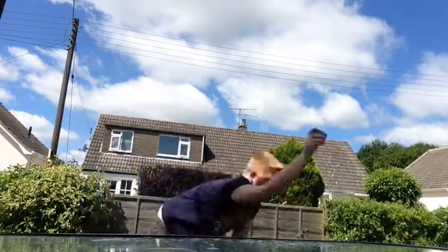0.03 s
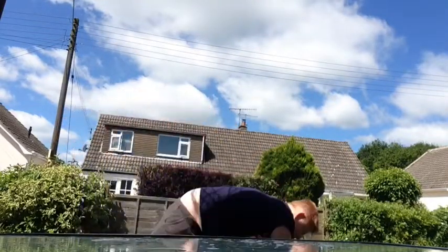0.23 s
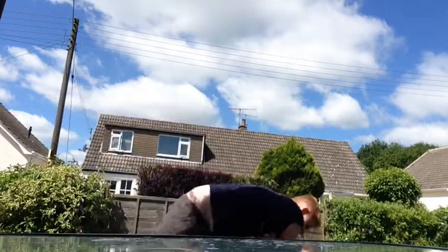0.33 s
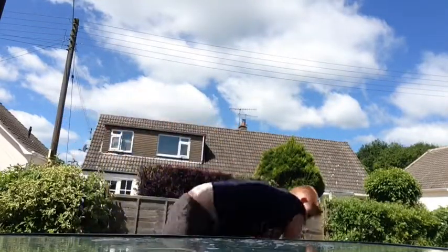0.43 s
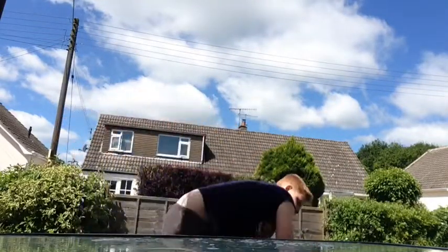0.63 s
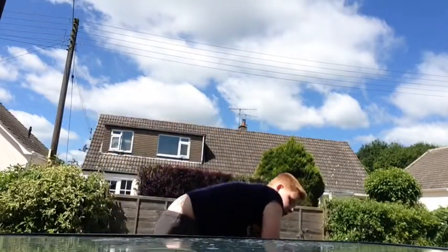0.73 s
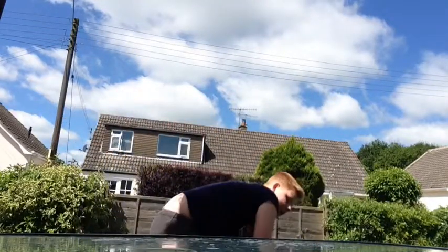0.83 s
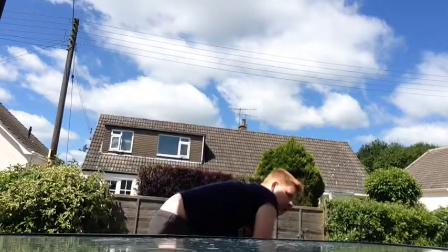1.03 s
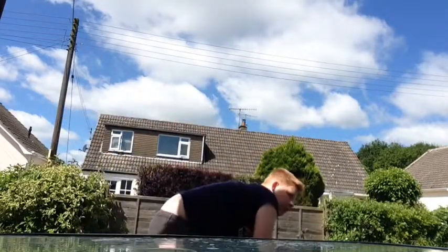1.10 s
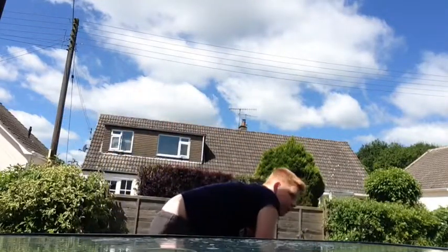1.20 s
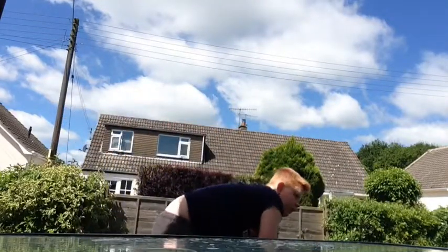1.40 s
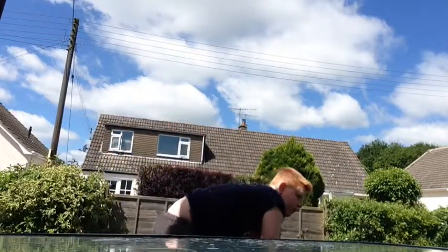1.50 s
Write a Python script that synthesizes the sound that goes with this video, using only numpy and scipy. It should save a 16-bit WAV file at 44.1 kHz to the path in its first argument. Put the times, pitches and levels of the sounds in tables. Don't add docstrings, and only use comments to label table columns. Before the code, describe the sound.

Sharp plastic crack with a heavy thud, followed by ever lighter bounces on gritty garden ground

```python
import sys
import numpy as np
from scipy import signal
from scipy.fft import rfft, irfft, next_fast_len
from scipy.io import wavfile
from scipy.ndimage import map_coordinates

SR = 44100
rng = np.random.default_rng(int(sys.argv[2]) if len(sys.argv) > 2 else 0)


def volts(x):
    e = np.asarray(x, float) / 20
    return 10 ** e


def unload_wav(signal):
    wavfile.write(
        sys.argv[1],
        SR,
        np.round(np.clip(np.atleast_2d(signal).T, -1, 1) * 32767).astype(np.int16),
    )


N = 68355


def unit(x):
    return x / np.sqrt(np.mean(x ** 2) + 1e-20)


def along(points, hz):
    point_hz, value = np.transpose(points)
    return np.interp(np.log(hz + 1), np.log(point_hz + 1), value)


def curve(rows):
    seconds, level_db = np.transpose(rows)
    return np.interp(np.arange(N) / SR, seconds, level_db)


def wobble(rate_hz):
    draws = rng.standard_normal(int(N * rate_hz / SR) + 4)
    return map_coordinates(draws, [np.arange(N) * rate_hz / SR])


def coloured(x, gain_db):
    size = next_fast_len(len(x) + 4096)
    gain = volts(gain_db(np.fft.rfftfreq(size, 1 / SR)))
    return unit(irfft(rfft(x, size) * gain, size)[:len(x)])


def hump(hz, centre_hz, below_db, above_db):
    octaves = np.log2((hz + 1) / centre_hz)
    slope_db = np.where(octaves < 0, below_db, above_db)
    return -np.sqrt(6.5 + (slope_db * octaves) ** 2)


def add(out, start_s, x):
    part = out[round(start_s * SR):][:len(x)]
    part += x[:len(part)]


# time in seconds, level in dB.
WIND_STRENGTH = [(0.0, -58.5), (0.124, -59.5), (0.25, -52.5), (0.328, -50), (0.482, -62), (0.702, -62),
                 (0.872, -52.5), (1.062, -58), (1.342, -52.5), (1.55, -60)]
# frequency in Hz, gain in dB.
RUMBLE_SPECTRUM = [(15, -39), (25, -9.5), (55, 0), (97, -0.5), (139, -1), (204, -9), (270, -16.5),
                   (498, -22), (561, -25.5), (600, -42.5), (780, -68.5), (1320, -120)]
# time in seconds, level in dB.
HOWL_STRENGTH = [(0.0, -49.5), (0.172, -54), (0.344, -52.5), (0.47, -60), (0.638, -56), (0.768, -55.5),
                 (1.208, -69), (1.368, -67.5), (1.55, -56)]
# frequency in Hz, gain in dB.
LEAF_SPECTRUM = [(240, -31.5), (400, -24), (643, -22), (1380, -16.5), (1790, -21.5), (3620, -30.5),
                 (4490, -32.5), (15500, -42)]
# time in seconds, level over their mean in dB.
LEAF_SWELL = [(0, 3), (.2, 3), (.5, 0), (.68, -5), (.95, -2), (1.13, -4), (1.28, 0), (1.4, 2), (1.55, 1)]


def wind():
    rumble = coloured(rng.standard_normal(N), lambda hz: along(RUMBLE_SPECTRUM, hz))
    rumble = unit(volts(3.0 * wobble(13.7)) * rumble)
    howl = coloured(rng.standard_normal(N), lambda hz: hump(hz, 182, 16, 16))
    hiss = coloured(rng.standard_normal(N), lambda hz: along(LEAF_SPECTRUM, hz))
    hiss = volts(0.71 * wobble(6.7)) * hiss
    leaves_db = -69
    out = volts(curve(WIND_STRENGTH) + 4.5) * rumble
    out += volts(curve(HOWL_STRENGTH) + 0.5) * howl
    return out + volts(curve(LEAF_SWELL) + leaves_db) * hiss


# peak in seconds, level in dB, rise in seconds, fall t60 in seconds, centre in Hz.
SLEEVE_SWISH = [
    (.160, -61, .035, .11, 5500),
    (.170, -69, .06, .1, 11000),
]
# peak in seconds, level in dB, rise in seconds, fall t60 in seconds, centre in Hz.
GROUND_SCUFFS = [(0.243, -31.5, 0.0056, 0.028, 3480), (0.259, -35.5, 0.0072, 0.19, 5160),
                 (.2600, -35.5, .004, 0.12, 1160), (0.716, -46, 0.0045, 0.066, 551),
                 (0.725, -49, 0.0087, 0.095, 3290), (.724, -62.5, 0.014, 0.15, 10000),
                 (.505, -69.5, 0.021, .2, 6505), (.7320, -38, 0.0074, 0.017, 2300),
                 (0.753, -56.5, 0.0081, 0.074, 2380), (0.807, -49, 0.0046, 0.012, 1950),
                 (0.818, -45.5, 0.0084, 0.14, 750), (0.831, -60.5, 0.025, 0.1, 6100),
                 (1.158, -53.5, 0.0032, 0.062, 2450), (1.155, -58, 0.0022, 0.07, 9000),
                 (1.183, -42, 0.0095, 0.15, 997), (1.203, -57, 0.0076, 0.17, 6150),
                 (1.2870, -65, 0.0012, 0.058, 4950), (1.300, -69, 0.0092, 0.33, 4210),
                 (1.3360, -60.5, 0.001, 0.09, 2800), (1.344, -75, 0.0036, 0.041, 10870),
                 (1.439, -71.5, 0.023, .15, 3800), (1.469, -58, 0.0038, 0.027, 4050),
                 (1.480, -57.5, 0.0018, 0.13, 1000), (1.485, -61, 0.0038, 0.2, 4620),
                 (1.540, -70, 0.0034, 0.062, 3560)]


def scuffs():
    out, t = np.zeros(N), np.arange(N) / SR
    grains_per_s, spread_db = 14000, 3
    for peak_s, db, rise, fall_t60, centre_hz in SLEEVE_SWISH + GROUND_SCUFFS:
        struck = rng.random(N) < grains_per_s / SR
        grain_db = spread_db * np.clip(rng.standard_normal(N), -2, 2)
        grit = struck * rng.standard_normal(N) * volts(grain_db)
        grit = coloured(grit, lambda hz: hump(hz, centre_hz, 9, 15))
        away = np.abs(t - peak_s)
        swell = np.where(t < peak_s, np.exp(-away / rise), volts(-60 * away / fall_t60))
        out += volts(db + 2.7 * wobble(200)) * swell * grit
    return out


# start in seconds, level in dB, pitch in Hz, t60 in seconds, rise
# in seconds.
LANDING_THUDS = [(0.244, -10.5, 77.2, 0.12, 0.0032), (0.246, -15, 276.6, 0.081, 0.0021),
                 (0.243, -17.5, 480.5, 0.08, 0.0011), (.2440, -22, 166, 0.11, 0.0014),
                 (0.245, -25, 337, .1, 0.00068), (0.298, -34.5, 90, 0.27, 0.0037),
                 (.7080, -16, 168.6, 0.024, 0.0014), (0.7187, -20, 112.1, 0.066, 0.00078),
                 (.7200, -30, 408, 0.019, 0.00051), (0.779, -40, 100.6, 0.049, 0.0025),
                 (.8065, -16.5, 93.9, 0.11, 0.0022), (.8100, -38.5, 521, .12, 0.0015),
                 (0.811, -50, 1103, 0.15, 0.0012), (1.152, -27, 138, 0.076, 0.0023),
                 (1.167, -24.5, 81.5, 0.16, 0.0045), (1.1818, -22, 143, 0.057, 0.0012),
                 (1.1800, -33.5, 307.6, 0.15, 0.0025), (1.1900, -42, 479, 0.2, 0.00084),
                 (1.207, -27.5, 86.6, 0.062, 0.0033), (1.1550, -39, 304, .06, 0.0017),
                 (1.4740, -44, 289.7, .1, .001), (1.4750, -45.5, 477, 0.1, 0.00078),
                 (1.4822, -33.5, 80.9, 0.17, 0.0011)]


def thuds():
    out, t = np.zeros(N), np.arange(SR // 2) / SR
    for start_s, db, hz, t60, rise in LANDING_THUDS:
        onset = (1 - np.exp(-t / rise)) ** 2
        add(out, start_s, volts(db - 60 * t / t60) * np.sin(2 * np.pi * hz * t) * onset)
    return out


# start in seconds, crack level in dB, ring level in dB, centre in Hz, crack t60 in seconds.
CONTACTS = [(0.2440, -19.5, -48, 370, 0.072), (.2445, -25.5, -40, 740, 0.013),
            (0.2439, -16.5, -53, 3520, 0.05), (0.244, -21.5, -45, 9000, 0.055),
            (.2456, -16, -37, 1489, 0.037), (0.2493, -27.5, -42, 4830, 0.041),
            (0.2725, -29, -45.5, 4000, 0.014), (0.8077, -33.5, -49.5, 1110, 0.048),
            (0.8083, -37.5, -53.5, 4560, 0.019), (.8120, -42, -59, 6270, 0.022),
            (.8090, -37, -57, 299, 0.05), (1.1720, -35.5, -41, 584, 0.057),
            (1.168, -35, -55.5, 2690, 0.037), (1.1698, -37.5, -59.5, 7090, 0.045),
            (1.1717, -32.5, -55.5, 1313, 0.047), (1.1850, -30.5, -45, 500, 0.042),
            (1.1893, -40, -66, 4970, 0.019), (1.1998, -43, -63, 7710, 0.016),
            (1.4714, -38.5, -49, 4170, 0.018), (1.4714, -45, -57, 7800, 0.0094),
            (1.4720, -40.5, -53.5, 2275, 0.041), (1.4726, -39.5, -53, 1137, 0.062),
            (1.4894, -52.5, -70, 3970, .02), (.2585, -30, -50, 5000, .015), (.2635, -30, -48, 2600, 0.024),
            (.2800, -31.5, -55, 6500, 0.017), (.2905, -40.5, -62, 7500, 0.019)]
# frequency in Hz, level in dB, t60 in seconds.
BOTTLE_MODES = [(750, 0, .03), (920, -2, .02), (1160, -1, .02), (1410, -3, .02), (1650, -5, .015),
                (2260, -3, .015), (2750, -3, .012), (3500, 0, .012), (4130, -3, .012), (4800, -5, .012)]


def knocks():
    out, t = np.zeros(N), np.arange(SR // 4) / SR
    for start_s, crack_db, ring_db, centre_hz, crack_t60 in CONTACTS:
        colour = lambda hz: hump(hz, centre_hz, 8, 11)
        crack = volts(crack_db - 60 * t / crack_t60) * coloured(rng.standard_normal(len(t)), colour)
        ring = np.zeros(len(t))
        for hz, db, t60 in BOTTLE_MODES:
            level_luck, pitch_luck = rng.standard_normal(2)
            decay = volts(db + 2 * level_luck + colour(hz) - 60 * t / t60)
            ring += decay * np.sin(2 * np.pi * hz * (1 + 0.022 * pitch_luck) * t)
        onset = 1 - np.exp(-t / 0.0002)
        add(out, start_s, (crack + volts(ring_db) * ring) * onset)
    return out


# start in seconds, level in dB, pitch in Hz, t60 in seconds.
PANEL_PINGS = [(.2440, -16, 3250, .018), (.2454, -8, 3590, .024), (.2455, -10, 1130, .022),
               (.2445, -21, 5500, .025), (.2443, -20, 2260, .028), (.2448, -19, 1645, .03),
               (.2442, -14, 930, .04), (.2446, -21, 760, .055), (.2452, -14, 4120, .028),
               (.2447, -20, 1410, .035), (.2450, -20, 2755, .022), (.2495, -22, 4800, .025),
               (.2525, -22, 4830, .03), (.2630, -34, 2420, .03), (.2820, -31, 1150, .02),
               (.7295, -41, 1650, .04), (.7300, -44, 2430, .035), (.8080, -42, 1220, .04),
               (.8085, -46, 4960, .025), (.8125, -45, 5000, .02), (1.1700, -36, 2950, .04),
               (1.1710, -40, 3410, .045), (1.1705, -38, 5600, .02), (1.1722, -31, 2000, .035),
               (1.1720, -32, 950, .06), (1.1730, -37, 1240, .055), (1.1730, -39, 1670, .045),
               (1.1790, -42, 2750, .04), (1.1885, -44, 4800, .02), (1.4714, -32, 3940, .022),
               (1.4720, -42, 3510, .04), (1.4720, -38, 1143, .07), (1.4722, -42, 1420, .05),
               (1.4716, -43, 6500, .02), (1.4716, -40, 4500, .02), (1.4725, -43, 860, .05),
               (1.4770, -50, 7300, .03), (1.4900, -51, 4300, .025)]


def pings():
    out, t = np.zeros(N), np.arange(SR // 8) / SR
    onset = 1 - np.exp(-t / .0005)
    for start_s, db, hz, t60 in PANEL_PINGS:
        add(out, start_s, volts(db - 60 * t / t60) * np.sin(2 * np.pi * hz * t) * onset)
    return out


# frequency in Hz, t60 in seconds.
YARD_DECAY = [(200, 0.5), (1000, 0.13), (5000, 0.068), (12000, 0.037)]
# delay in seconds, level in dB, smear t60 in seconds.
WALL_ECHOES = [
    (.09, -42.5, 0.99),
    (.116, -36.5, 0.085),
    (.25, -51, .3),
]
# frequency in Hz, gain in dB.
WALL_SPECTRUM = [(200, -0.5), (1000, -2), (2600, -7.5), (5000, -2), (8000, -1.5), (15000, -8)]


def garden(x):
    answer = np.zeros(SR)
    hz, frame_s, bins = signal.stft(rng.standard_normal(SR // 2), SR, nperseg=256)
    decay = volts(-60 * frame_s / along(YARD_DECAY, hz)[:, None])
    scatter = signal.istft(bins * decay, SR, nperseg=256)[1]
    add(answer, .004, volts(-15.5) * scatter / np.linalg.norm(scatter))
    t = np.arange(SR // 2) / SR
    for delay, db, smear_t60 in WALL_ECHOES:
        echo = coloured(rng.standard_normal(len(t)), lambda f: along(WALL_SPECTRUM, f))
        echo = echo * volts(-60 * t / smear_t60) * (1 - np.exp(-t / .006))
        add(answer, delay, volts(db) * echo / np.linalg.norm(echo))
    return signal.fftconvolve(x, answer)[:N]


def scene():
    sharp = knocks() + pings() + scuffs()
    return (sharp + garden(sharp) + thuds() + wind())[None]


def low_pass(x):
    return signal.sosfilt(signal.butter(12, 15930, fs=SR, output="sos"), x)


def record(dry):
    bass_hz, top_hz = 35, 15300
    x = signal.sosfilt(signal.butter(2, bass_hz, "high", fs=SR, output="sos"), dry)
    hz = np.fft.rfftfreq(N, 1 / SR)
    mix = irfft(rfft(x) * np.clip((top_hz + 400 - hz) / 800, 0, 1), N)
    return low_pass(mix)


dry = scene()
out = record(dry)
unload_wav(out)
```